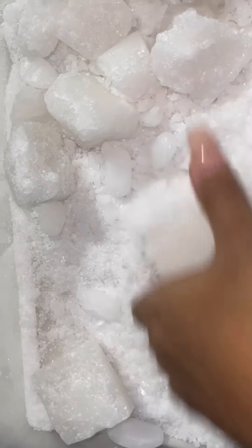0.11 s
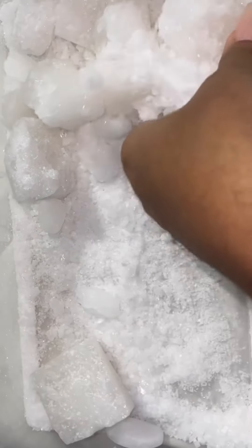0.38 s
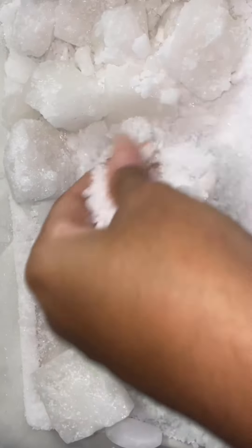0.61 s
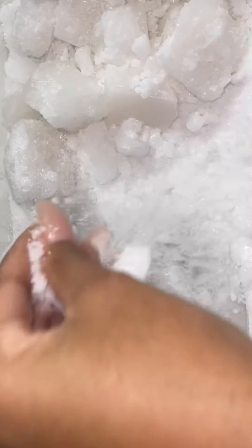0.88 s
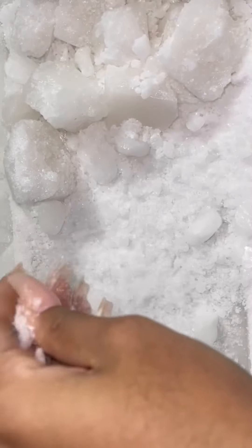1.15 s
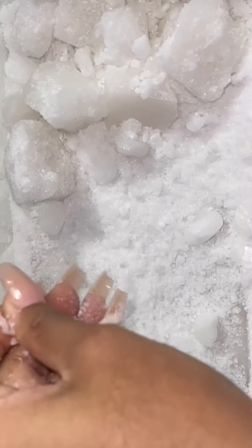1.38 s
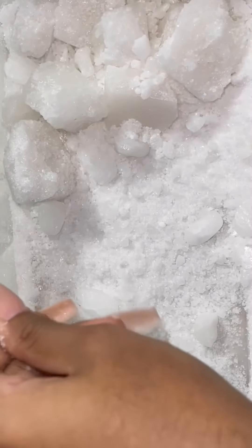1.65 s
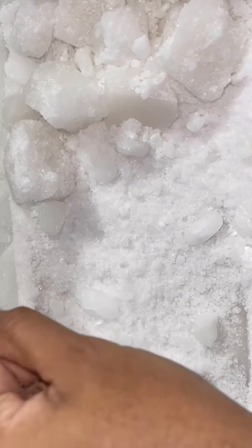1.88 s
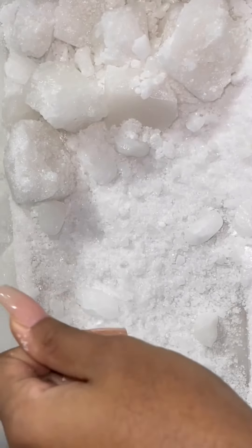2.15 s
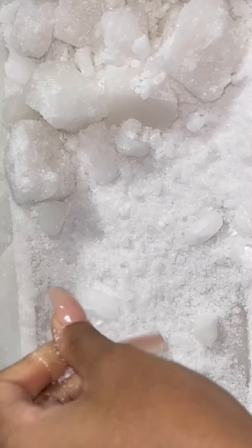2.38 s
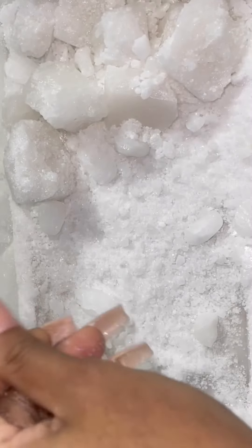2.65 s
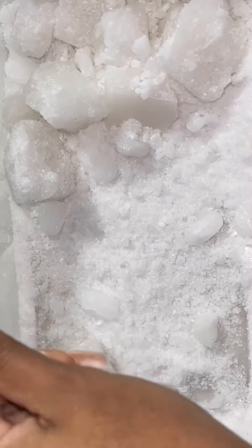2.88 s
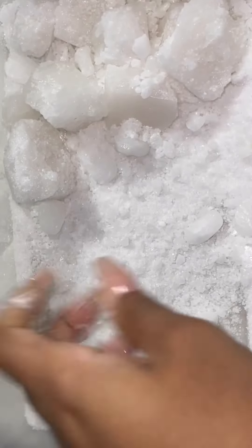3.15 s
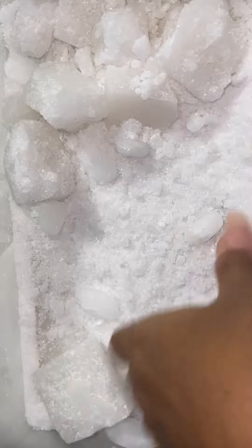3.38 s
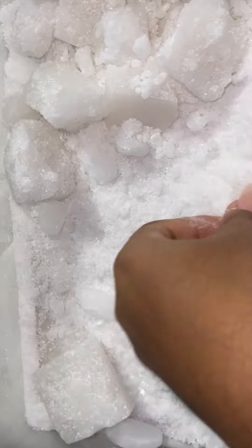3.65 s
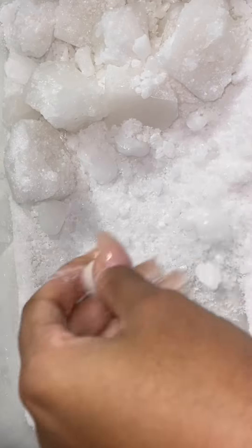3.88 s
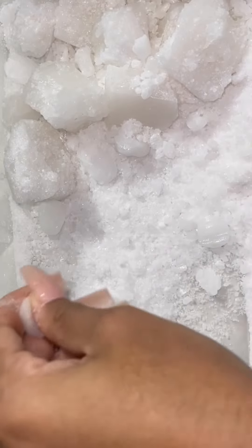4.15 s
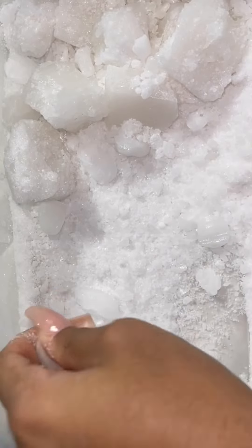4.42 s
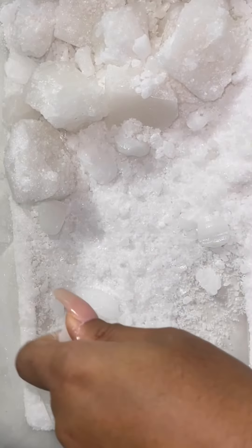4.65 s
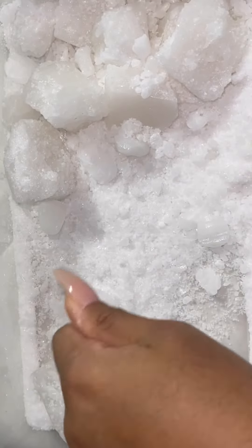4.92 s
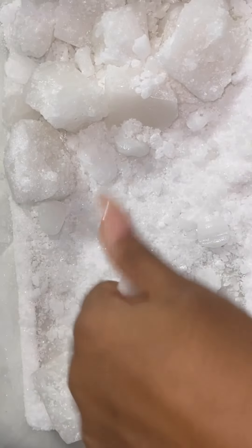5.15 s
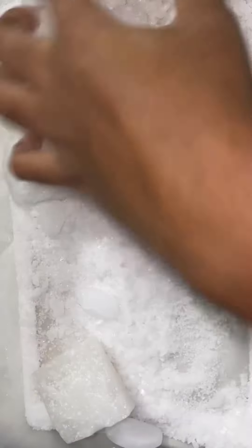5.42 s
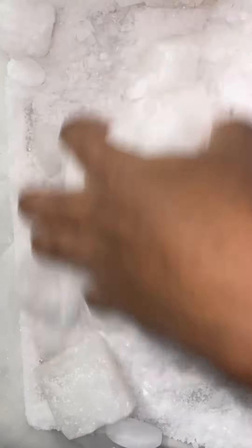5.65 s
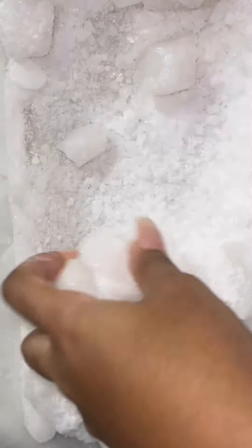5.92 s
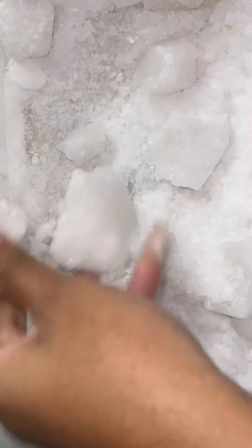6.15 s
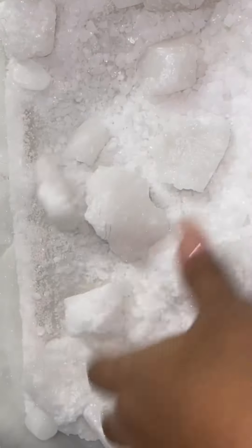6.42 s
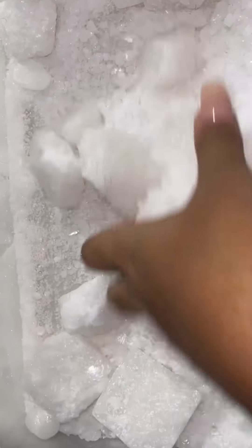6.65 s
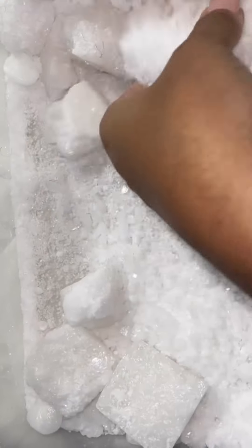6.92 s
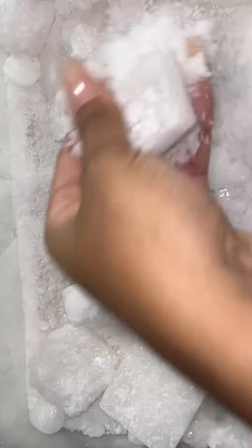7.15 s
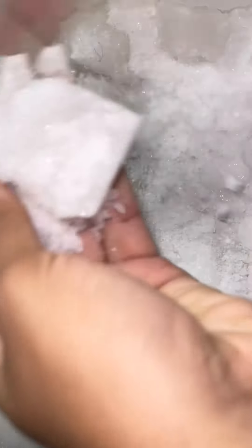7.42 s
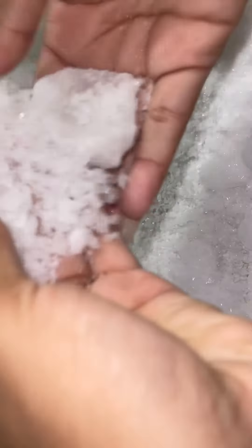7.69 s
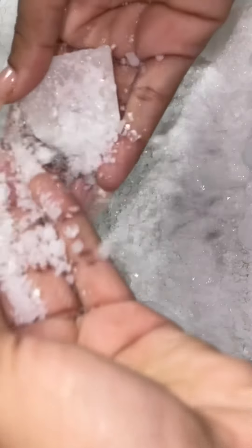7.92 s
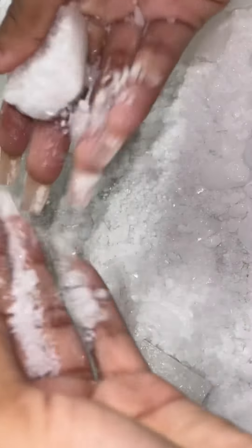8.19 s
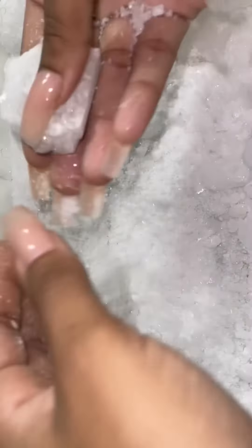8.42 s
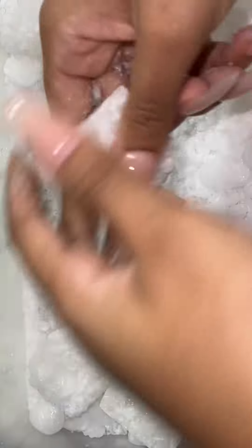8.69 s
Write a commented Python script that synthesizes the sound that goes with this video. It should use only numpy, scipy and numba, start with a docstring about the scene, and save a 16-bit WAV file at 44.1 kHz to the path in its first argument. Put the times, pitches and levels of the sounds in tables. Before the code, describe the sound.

Crisp crunching burst, quiet sparse ticks, then heavy gritty crushing and thuds of brittle lumps in a tray, ending in lighter crumbling.

```python
"""A burst of crunching opens the scene, then lumps knock together as hands scoop, crush and drop brittle crystals.
Each fracture is a bright tick of shaped noise followed by a short, sinking knock in the lump and the shallow tray.
Thousands of small breaks make the crunch, crumbs hiss as they slide, and heavy lumps thud through tray resonances.
A quiet room of coloured noise and narrow, wavering hums lies behind, all heard close to one microphone."""
import sys
import numpy as np
from scipy import signal
from scipy.fft import rfft, irfft
from scipy.io import wavfile
from scipy.ndimage import uniform_filter1d
from numba import njit

SR = 44100
rng = np.random.default_rng(int(sys.argv[2]) if len(sys.argv) > 2 else 0)


def level_to_linear(level):
    """Convert decibel levels to linear amplitude factors, elementwise."""
    exponent = np.asarray(level, float) / 20
    return 10 ** exponent


def to_wav(s):
    """Save 16-bit WAV."""
    ch = np.atleast_2d(s).T  # columns
    pcm = np.round(np.clip(ch, -1, 1) * 32767)  # PCM
    wavfile.write(sys.argv[1], SR, pcm.astype(np.int16))


N = 388080


def unit(x):
    """Scale to rms 1."""
    return x / np.sqrt(np.mean(x ** 2))


def colour(x, points):
    """Minimum-phase filter through (Hz, dB) points, built by folding the cepstrum onto positive time."""
    hz, db = np.transpose(points)
    grid_hz = np.linspace(1, SR / 2, 2049)
    log_gain = np.interp(np.log(grid_hz), np.log(hz), db) * np.log(10) / 20
    cepstrum = irfft(log_gain)
    cepstrum[1:2048] *= 2
    cepstrum[2049:] = 0
    response = irfft(np.exp(rfft(cepstrum)))
    return signal.fftconvolve(x, response)[:N]


def peak(x, hz, width):
    """Resonance, gain 1 at the centre."""
    return signal.lfilter(*signal.iirpeak(hz, hz / width, fs=SR), x)


def fade(x, t60):
    """Every impulse leaves an envelope that dies by 60 dB in t60 seconds."""
    return signal.lfilter([1], [1, -np.exp(-np.log(1000) / (t60 * SR))], x)


def noisy_fade(impulses, t60):
    """Every impulse sets off a dying burst of noise."""
    return fade(impulses, t60) * rng.standard_normal(N)


def strikes(start_s, size):
    """Impulses at the given times."""
    return np.bincount(np.clip((start_s * SR).astype(int), 0, N - 1), size, N)


def gestures(peak_s, level_db, swell_s, fade_s, rest_db):
    """Level in dB of overlapping moves that swell to a peak and die away; powers add."""
    t = np.arange(0, N, 32) / SR
    late = t - peak_s[:, None]
    drop_db = 20 * np.where(late < 0, -late / swell_s[:, None], late / fade_s[:, None])
    power = np.sum(level_to_linear(2 * (level_db[:, None] - drop_db)), axis=0) + level_to_linear(2 * rest_db)
    return np.interp(np.arange(N) / SR, t, 10 * np.log10(power))


@njit
def knocks(start, hz, size, turn, cycles, sag, count):
    """Short tones that swell, sink in pitch and are choked by the palm or the heap."""
    out = np.zeros(count)
    for k in range(len(start)):
        tau = cycles * SR / hz[k]
        phase = turn[k]
        for i in range(min(int(3 * tau), count - start[k])):
            u = i / tau
            phase += 2 * np.pi * hz[k] / SR * (1 + sag * (np.exp(-2 * u) - .2))
            out[start[k] + i] += size[k] * u * u * np.exp(1 - u * u) * np.sin(phase)
    return out


def ticks(impulses, spike_db, t60, tail_db, tail_t60):
    """A sharp spike at each break, a burst of grit, then splinters settling."""
    # spectrum of a break: pitch_hz [Hz], level_db [dB]
    grit_colour = [(600, -34.5), (1200, -6.5), (1700, -11), (2700, -12), (5700, -19), (10400, -27),
                   (11800, -33), (15500, -46.5), (16400, -95)]
    envelope = fade(impulses, t60) + level_to_linear(tail_db) * fade(impulses, tail_t60)
    burst = uniform_filter1d(envelope, size=30) * rng.standard_normal(N)
    return colour(level_to_linear(spike_db) * impulses + burst, grit_colour)


def tray(push):
    """Low modes of the tray under a soft blow."""
    # tray modes: pitch_hz [Hz], level_db [dB], t60_s [s]
    modes = [(118.3, 8.5, 0.087), (187.5, -1, 0.023), (268, 0, 0.0137)]
    soft = signal.lfilter(*signal.butter(2, [62., 350.], "band", fs=SR), push)
    return sum(level_to_linear(db) * peak(soft, hz, np.log(1000) / np.pi / t60) for hz, db, t60 in modes)


def hollow(x):
    """Resonances of the air among tray, lumps and palms."""
    # air resonances: pitch_hz [Hz], width_hz [Hz], level_db [dB]
    air_modes = [(553, 136, 6.5), (735, 254, 7.5), (1165, 43, 7.5), (1655, 72, 8)]
    return sum(level_to_linear(db) * peak(x, hz, width) for hz, width, db in air_modes)


def room():
    """Steady coloured air noise with a faint hum of narrow noise bands, so that it wavers."""
    # spectrum of the air noise: pitch_hz [Hz], level_db [dB]
    air_colour = [(30, -35), (55, -17), (210, -3.5), (400, -7), (700, -4.5), (850, -10.5), (1300, -11),
                  (1800, -12), (2300, -18), (5300, -32.5), (6000, -67), (16000, -87.5)]
    # hum bands: pitch_hz [Hz], width_hz [Hz], level_db [dB rms]
    hum_bands = [(58.7, 4.6, -67), (119, 7.8, -69), (236.8, 6, -60), (635, 13, -63.5), (1085, 28, -66.5),
                 (1729, 38, -64)]
    air = level_to_linear(-53.5) * unit(colour(rng.standard_normal(N), air_colour))
    hum = sum(level_to_linear(db) * unit(peak(rng.standard_normal(N), hz, width)) for hz, width, db in hum_bands)
    return air + hum


def crumb_hiss(start, size, turn, bright, high):
    """Crumbs slide as steady noise; dull breaks add noise bursts and bright ones high chinks."""
    # slides and trickles: peak_s [s], hiss_db [dB], swell_s and fade_s [s per 20 dB]
    slides = [(0.0, -33, .02, 0.13), (0.1, -42, .1, .4), (0.5, -45.5, 1, 0.5), (0.753, -39.5, 0.43, 0.097),
              (0.87, -39.5, 0.19, 0.22), (1.15, -57.5, 0.27, 0.47), (1.338, -54.5, 0.35, 0.022),
              (1.545, -53.5, 0.23, 0.094), (1.772, -44.5, 0.0079, 0.014), (2.047, -41.5, 0.027, 0.038),
              (2.16, -55.5, 0.1, 0.26), (2.47, -49, 0.019, 0.14), (2.696, -52.5, 0.013, 0.082),
              (2.881, -40.5, 0.035, 0.061), (3.327, -36.5, 0.14, 0.12), (3.738, -52, 0.73, 0.15),
              (4.69, -54, 0.02, 0.037), (4.807, -42, 0.005, 0.017), (5.153, -59, 0.055, 0.12),
              (5.25, -38, 0.012, .1), (5.342, -34, 0.053, 0.17), (5.539, -37, 0.22, 0.13),
              (5.867, -39, 0.1, 0.15), (5.981, -46, 0.02, 0.054), (6.153, -32, 0.11, 0.14),
              (6.32, -38.5, 0.088, 0.098), (6.521, -38, 0.25, .06), (6.65, -34, 0.11, 0.18),
              (6.917, -43, 0.78, 0.84), (7.321, -49.5, 0.26, 1), (7.556, -42, 0.048, 0.24),
              (7.715, -41.5, 0.075, .3), (8.087, -45, 0.16, 0.62), (8.28, -39, 0.19, 0.11),
              (8.492, -37.5, 0.033, 0.035), (8.608, -48.5, 0.0614, 0.14)]
    # spectrum of sliding crumbs: pitch_hz [Hz], level_db [dB]
    sand_colour = [(2000, -5), (3500, 0.5), (4600, -1.5), (10200, -0.5), (11500, -10.5), (15600, -9.5),
                   (16400, -36)]
    level_db = gestures(*np.transpose(slides), rest_db=-110)
    crumbs = strikes(start / SR, size * level_to_linear(-14 * bright))
    snap = unit(colour(noisy_fade(crumbs, 0.029), sand_colour))
    slide = unit(colour(rng.standard_normal(N), sand_colour))
    chink_size = size * level_to_linear(-6 * high - 20 * (1 - bright))
    chink = unit(knocks(start, 5010.0 * level_to_linear(10 * high), chink_size, turn, 2.6, 0.048, count=N))
    return level_to_linear(level_db) * unit(1.66 * snap + 0.75 * slide + 0.67 * chink)


def crunch(start, size, turn, low, high):
    """Many small breaks merge: dull knocks, ringing chips, rasping air and gritty ticks."""
    impulses = strikes(start / SR, size)
    knock = unit(knocks(start, 407.7 * level_to_linear(18.1 * low), size * level_to_linear(-3 * low), turn, 2.38, 0.49, count=N))
    chip_size = size ** 1.4 * level_to_linear(-3 * high)
    chip = unit(knocks(start, 1414.0 * level_to_linear(11.6 * high), chip_size, turn, 4.5, 0.1, count=N))
    rasp = unit(hollow(noisy_fade(impulses, 0.014)))
    grit = unit(ticks(impulses, 23.4, 0.0029, -16.5, 0.25))
    return unit(.9 * knock + rasp + 1.15 * grit + .9 * chip)


def handling():
    """Thousands of small breaks of uneven size and brightness follow the pushes of the hands."""
    # pushes into the lumps: peak_s [s], crunch_db [dB], weight on the tray [dB], swell_s, fade_s [s per 20 dB]
    pushes = [(0.0, -19.5, -45, .02, 0.059), (0.07, -31, -39.5, 0.098, 0.32), (0.411, -36, -52, 0.17, 0.22),
              (0.755, -34.5, -44, 0.24, 0.033), (0.823, -32, -43, 0.051, 0.051),
              (0.891, -27, -35, 0.037, 0.095), (1.034, -50, -67, 0.067, 0.66),
              (3.164, -21, -27, 0.0079, 0.014), (3.284, -24, -39, 0.072, 0.07),
              (3.368, -31, -31.5, 0.12, 0.058), (3.625, -50, -52, 0.47, 0.065),
              (3.664, -43.5, -51, 0.066, 0.15), (4.804, -45, -49, 0.027, 0.07),
              (5.111, -37, -28.5, 0.02, 0.038), (5.252, -20.5, -22, 0.0071, 0.074),
              (5.343, -25, -32, 0.076, 0.46), (5.54, -21, -30.5, 0.2, 0.19), (5.66, -28, -36, 0.25, 0.057),
              (5.867, -31.5, -38, 0.11, .2), (5.956, -22.5, -25, 0.038, 0.019),
              (6.076, -15.5, -12.5, 0.0085, 0.035), (6.151, -20.5, -23.5, 0.073, 0.18),
              (6.318, -23.5, -35.5, 0.09, 0.14), (6.45, -28, -37, 0.21, 0.28),
              (6.559, -20, -37, 0.072, 0.11), (6.625, -18, -26, 0.094, 0.066),
              (6.692, -28, -31, 0.055, 0.15), (6.917, -34, -46, 0.3, 0.47), (7.188, -39, -65, 0.031, 0.23),
              (7.322, -36, -54, 0.082, 0.21), (7.7, -34.5, -69, 0.14, 0.6),
              (7.882, -32.5, -71.5, 0.059, 0.068), (7.979, -34.5, -59, 0.2, 0.021),
              (8.087, -42, -57, 0.072, 0.17), (8.279, -33, -48, 0.36, 0.12), (8.55, -50, -63, 0.68, 0.47)]
    peak_s, push_db, weight_db, swell_s, fade_s = np.transpose(pushes)
    # rest levels: hands resting on the heap
    crunch_db = gestures(peak_s, push_db, swell_s, fade_s, rest_db=-69.5)
    rumble_db = gestures(peak_s, weight_db, swell_s, fade_s, rest_db=-88)

    when, big, low, high, turn, bright, luck = rng.random((16000, 7)).T
    start = (when * N).astype(np.int64)
    turn = 2 * np.pi * turn
    share = np.clip(level_to_linear(.8 * (crunch_db[start] + 20)), .35, 1)  # the harder the push, the denser the breaks
    size = level_to_linear(np.minimum(-4.5 * np.log(big), 11))  # a crumb can only be so large
    size = size * (luck < share) / np.sqrt(share)  # sparse breaks are larger, which evens the power

    rumble = unit(tray(noisy_fade(strikes(start / SR, size), 0.032)))
    hiss = crumb_hiss(start, size, turn, bright, high)
    return hiss + level_to_linear(crunch_db) * crunch(start, size, turn, low, high) + level_to_linear(rumble_db) * rumble


def cracks():
    """Single breaks and bumps: snap, ring and splinters lead, the knock swells after, deep knocks move the tray."""
    # single breaks: start_s [s], snap_db [dB before mixing], ring_hz [Hz], knock_db [dB before mixing], knock_hz [Hz]
    breaks = [(0.3493, -26, 2370, -36, 550), (0.4609, -27, 3250, -42, 783),
              (0.5001, -13.5, 3260, -29, 1380), (0.584, -19.5, 8900, -34, 740),
              (0.636, -19, 3120, -24, 850), (0.6626, -14.5, 4900, -31.5, 385),
              (0.6978, -16, 2700, -24, 790), (0.7209, -21, 1900, -26, 541), (0.7526, -13, 1800, -6, 324),
              (0.8885, -12, 2620, -17, 586), (0.947, -20, 2200, -26.5, 1270),
              (0.9765, -24, 3830, -25.5, 1360), (1.02, -26.5, 1710, -41, 1440),
              (1.1036, -29.5, 2540, -47, 1250), (1.172, -22.5, 2650, -25, 696),
              (1.3633, -17.5, 2100, -32, 735), (1.948, -36, 1860, -37.5, 806),
              (1.9711, -27, 1820, -47, 257), (2.0404, -27, 6270, -35, 1220), (2.098, -29.5, 3680, -53, 250),
              (2.2221, -27, 1800, -40, 824), (2.3282, -35, 1850, -45, 510), (2.3784, -35, 2170, -42.5, 616),
              (2.693, -36.5, 8600, -57, 614), (2.923, -30, 6600, -52, 250), (3.0232, -34.5, 1840, -52, 254),
              (3.1519, -28, 1970, -29, 670), (3.1647, -14.5, 1970, -13, 635),
              (3.2572, -23, 1810, -17.5, 535), (3.2657, -7.5, 2660, -19, 238),
              (3.2848, -20, 2770, -16, 525), (3.3437, -23, 3020, -27, 540), (3.5316, -25.5, 3320, -43, 656),
              (3.7349, -18, 3900, -33.5, 660), (3.9565, -39, 4340, -63, 251),
              (4.786, -16, 2380, -33.5, 473), (5.119, -35, 2180, -24, 790), (5.245, -6.5, 2760, -13, 540),
              (5.314, -12, 2200, -26, 1270), (5.3317, -10.5, 2260, -22, 1180),
              (5.4255, -7, 2620, -29.5, 1150), (5.445, -7, 2580, -18, 1190), (5.635, -23, 4000, -33, 1490),
              (5.6391, -6.5, 3360, -31, 603), (5.689, -13.5, 2740, -22, 395),
              (5.8152, -29, 3400, -31.5, 799), (5.879, -16, 2750, -26.5, 560),
              (5.9438, -14.5, 4440, -25.5, 635), (6.0617, -9, 3230, -10, 492), (6.0713, -6, 3220, -17, 268),
              (6.1065, -8, 2580, -17, 506), (6.115, -7, 2040, 0, 1307), (6.1478, -1.5, 3300, -11.5, 805),
              (6.325, -16, 2440, -17, 1340), (6.5486, -10, 2150, -21, 504), (6.5525, -7.5, 2540, -31, 1490),
              (6.7956, -23, 1950, -28, 635), (7.091, -25, 1980, -35, 352),
              (7.1791, -18.5, 2930, -11.5, 580), (7.2044, -27, 3790, -40, 248),
              (7.3121, -19, 2300, -33, 710), (7.684, -24.5, 2250, -36.5, 523),
              (7.7037, -25.5, 5090, -34, 623), (7.743, -17, 2150, -25, 1150),
              (7.792, -10.5, 2330, -25, 805), (7.814, -21, 3000, -25, 636), (7.8236, -23, 2070, -29, 664),
              (7.8489, -9.5, 2360, -20, 1380), (7.8978, -20, 2260, -24.5, 515),
              (7.9344, -18, 2300, -25, 560), (7.9706, -22, 2960, -23, 1250),
              (8.0323, -27, 2230, -29.5, 880), (8.18, -22, 1920, -30.5, 790),
              (8.384, -25, 3500, -31.5, 816), (8.4737, -13, 4630, -36, 580),
              (8.4935, -25, 2350, -25.5, 1210), (8.5916, -25.5, 3770, -46, 633)]
    # lumps bumping each other or the tray unbroken: start_s [s], knock_db [dB before mixing], knock_hz [Hz]
    bump_table = [(0.032, -25, 660), (0.1, -26, 530), (0.2294, -30, 740), (0.7298, -19.5, 665),
                  (0.8032, -15, 550), (0.896, -20, 483), (0.902, -20, 530), (0.927, -27, 540),
                  (3.1796, -15, 750), (3.292, -24, 486), (3.3041, -19.5, 510), (3.35, -21.5, 484),
                  (3.3685, -23, 566), (3.383, -26.5, 654), (3.6411, -34, 670), (3.658, -32, 566),
                  (3.6715, -29, 520), (5.0948, -17.5, 510), (5.385, -27, 467), (5.533, -15, 1570),
                  (5.539, -25, 527), (5.56, -24, 665), (5.584, -15, 719), (5.62, -24, 592),
                  (6.067, -8, 200), (6.078, -18, 202), (6.127, -17, 520), (6.18, -19, 363),
                  (6.219, -21.5, 870), (6.408, -29, 550), (6.556, -14.5, 550), (6.583, -25, 195),
                  (6.607, -17, 1260), (6.616, -18, 1640), (6.632, -13, 1400), (6.649, -20, 207),
                  (6.913, -48, 517), (6.935, -28.5, 1260), (6.955, -30, 930), (7.186, -22.5, 549),
                  (7.324, -39, 657), (7.578, -25, 1510), (7.6045, -25.5, 510), (7.649, -25.5, 523),
                  (7.76, -27, 530), (7.796, -24, 820), (7.863, -25, 1210), (7.877, -28, 540),
                  (7.91, -32, 1180), (7.975, -24.5, 520), (8.0646, -28, 745), (8.0825, -28, 890),
                  (8.106, -29, 649), (8.129, -32, 540), (8.214, -30, 694), (8.257, -30, 595),
                  (8.272, -26, 666), (8.286, -24.5, 760)]
    # a bump has a faint tick, 15 dB under its knock before mixing
    bumps = [(s, db - 15, 2270, db, hz) for s, db, hz in bump_table]
    start_s, snap_db, ring_hz, knock_db, knock_hz = np.transpose([*breaks, *bumps])
    start = (start_s * SR).astype(np.int64)
    turn = 2 * np.pi * rng.random((len(start_s), 4)).T
    knock_size = level_to_linear(knock_db)

    # small, high-ringing chips throw more fine splinters
    tilt_db = 2.5 * np.log2(ring_hz / 2800)
    dull, fine = (signal.butter(3, 4500., kind, fs=SR) for kind in ("low", "high"))
    snap_hits = strikes(start_s, level_to_linear(snap_db - .6 * tilt_db))
    snap = signal.lfilter(*dull, ticks(snap_hits, 14, 0.008, -16, 0.045))
    splinter_hits = strikes(start_s, level_to_linear(snap_db + tilt_db))
    splinter = signal.lfilter(*fine, ticks(splinter_hits, 12, .007, -14, .03))
    ring = knocks(start, ring_hz, level_to_linear(snap_db), turn[2], 4.33, 0.033, count=N)

    knock = knocks(start, knock_hz, knock_size, turn[0], 1.555, 0.64, count=N)
    overtone = knocks(start, 1.982 * knock_hz, knock_size, turn[1], 2.9, 0.54, count=N)
    knock = knock + level_to_linear(-8.5) * overtone
    rattle = hollow(noisy_fade(strikes(start_s, knock_size), 0.024))

    # light or high knocks hardly reach the tray
    depth = (122.0 / knock_hz) ** 0.96 * level_to_linear(0.54 * (knock_db + 8.5))
    blow = knock_size * depth
    # the lump's weight sinks into the heap
    thump = knocks(start, np.full(len(start_s), 200.), blow, turn[3], 1.4, 0.35, count=N)
    thud = tray(noisy_fade(strikes(start_s + 0.0016, blow), 0.077))  # the tray answers 1.6 ms later

    sharp = level_to_linear(10) * snap + level_to_linear(14.0) * splinter + level_to_linear(-8) * ring
    body = level_to_linear(3.0) * knock + level_to_linear(3) * rattle
    return sharp + body + level_to_linear(1.5) * thump + level_to_linear(5.5) * thud


def scene():
    """All sources at one microphone."""
    return (room() + handling() + cracks())[None]


def top_cut(x):
    """Nothing passes above the cut-off."""
    return signal.sosfilt(signal.butter(12, 16000, fs=SR, output="sos"), x)


def record(dry):
    """The microphone drops the deepest bass and the loudest peaks are rounded."""
    thin = signal.sosfilt(signal.butter(4, 48., "high", fs=SR, output="sos"), dry)
    rounded = np.tanh(1.065 * thin) / 1.093
    return top_cut(rounded)


dry = scene()
out = record(dry)
to_wav(out)
```